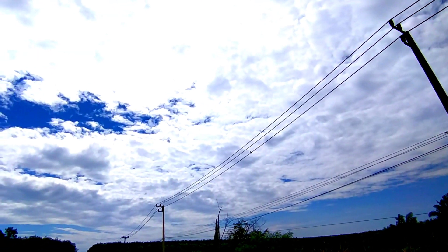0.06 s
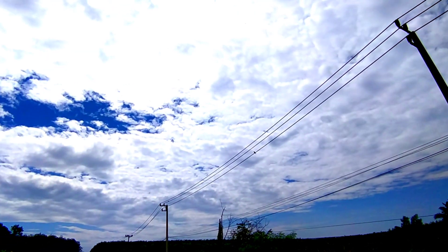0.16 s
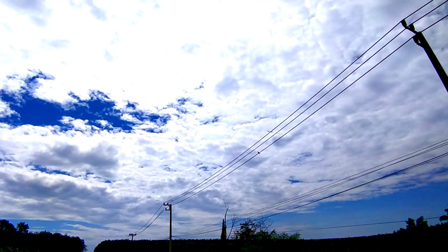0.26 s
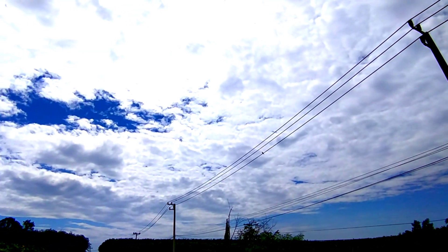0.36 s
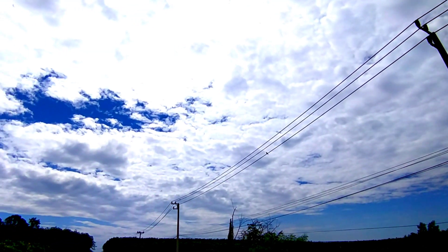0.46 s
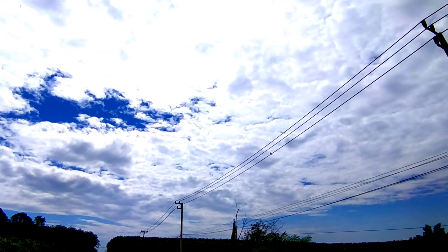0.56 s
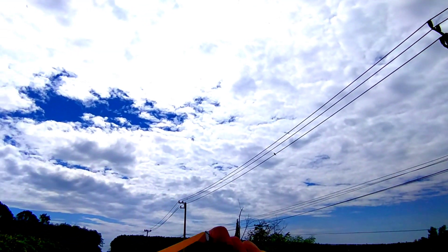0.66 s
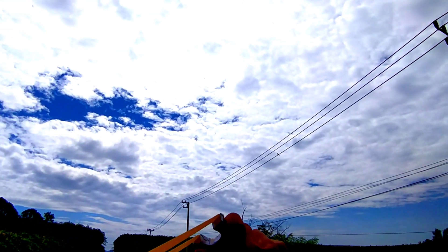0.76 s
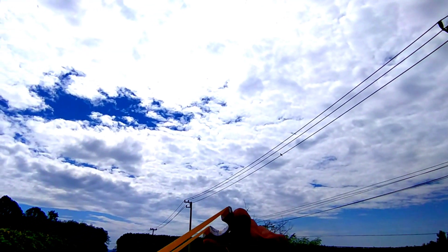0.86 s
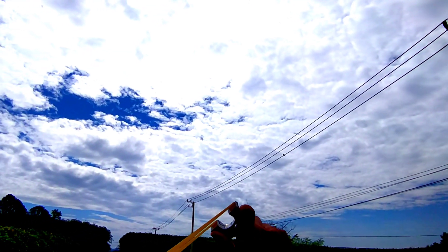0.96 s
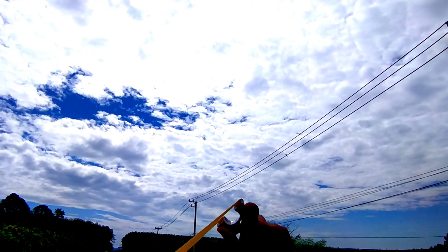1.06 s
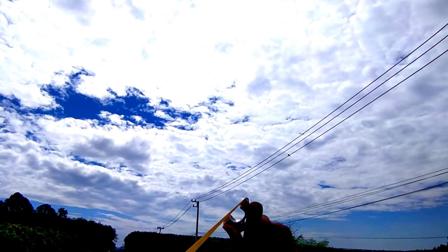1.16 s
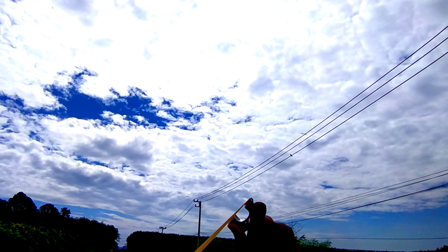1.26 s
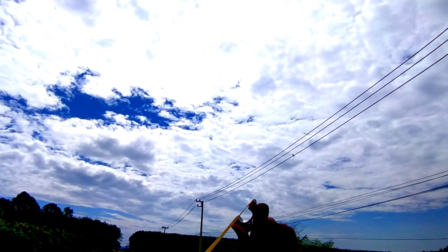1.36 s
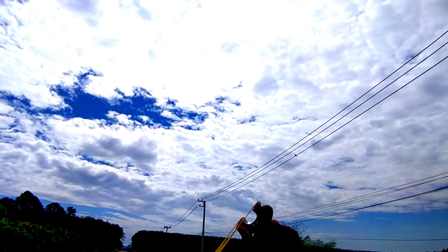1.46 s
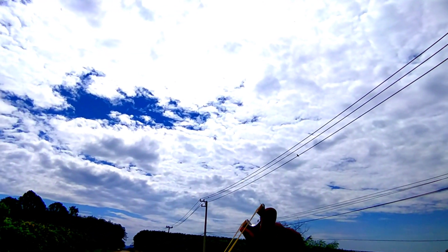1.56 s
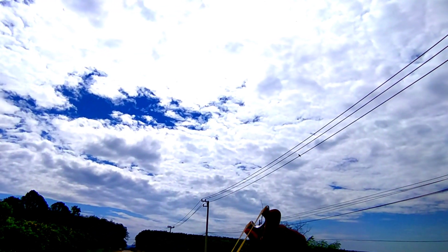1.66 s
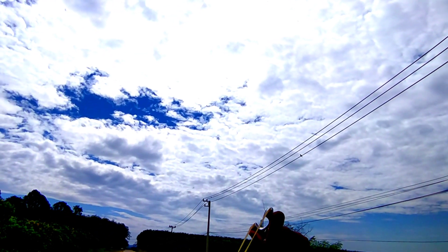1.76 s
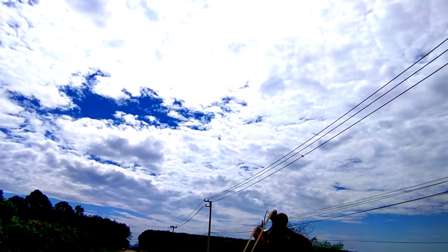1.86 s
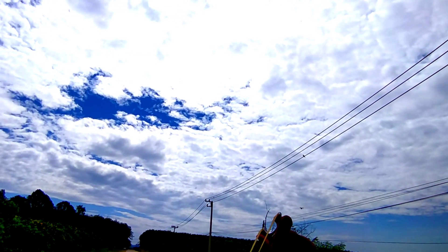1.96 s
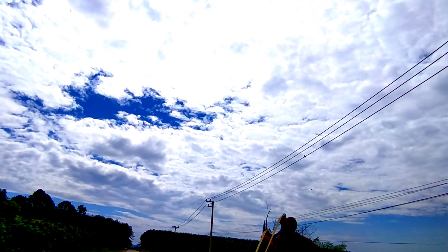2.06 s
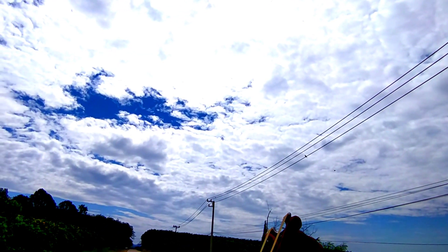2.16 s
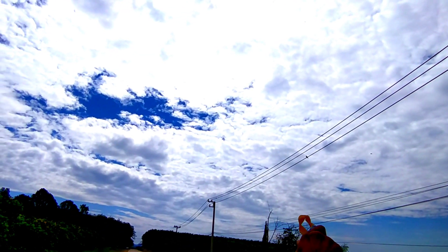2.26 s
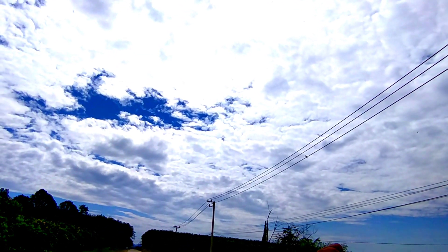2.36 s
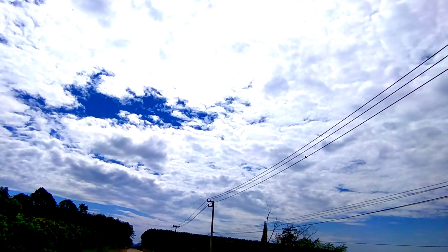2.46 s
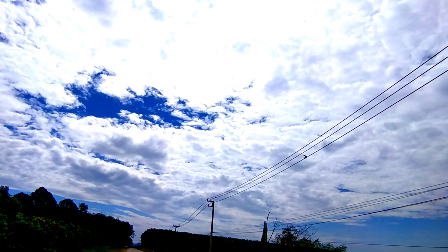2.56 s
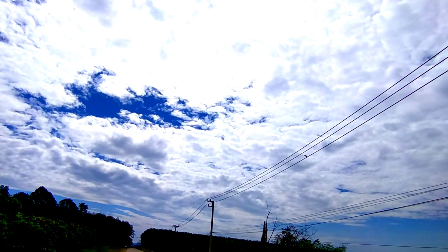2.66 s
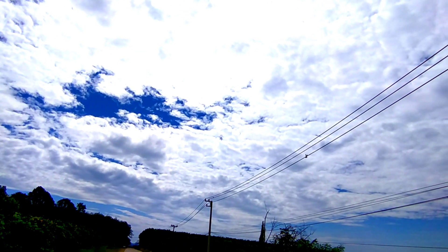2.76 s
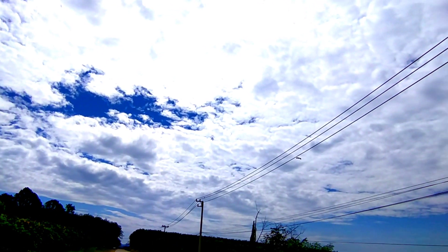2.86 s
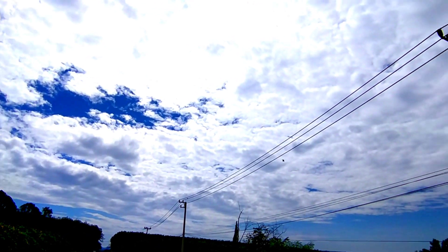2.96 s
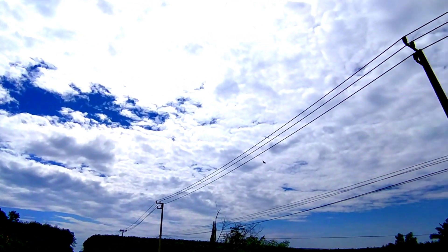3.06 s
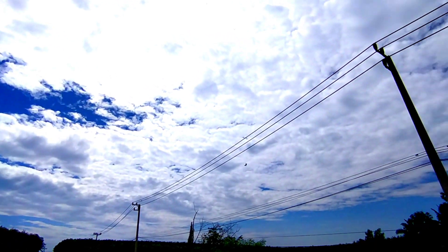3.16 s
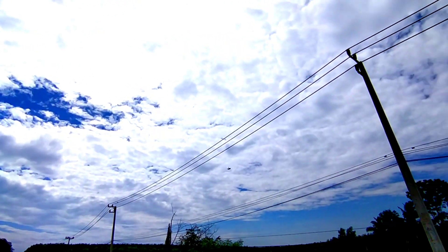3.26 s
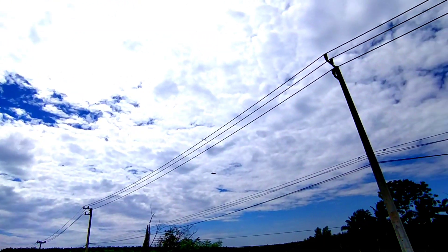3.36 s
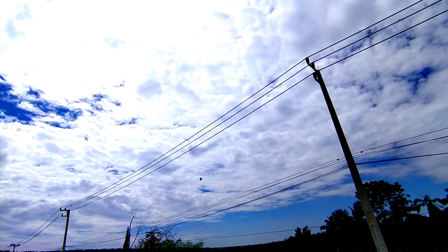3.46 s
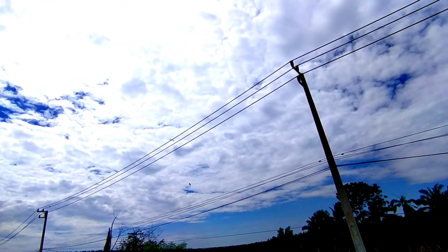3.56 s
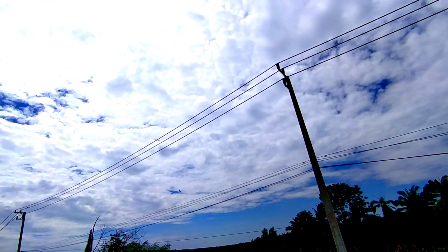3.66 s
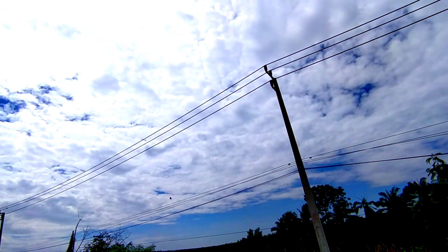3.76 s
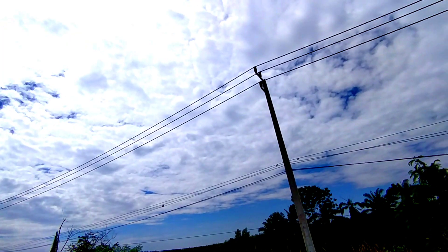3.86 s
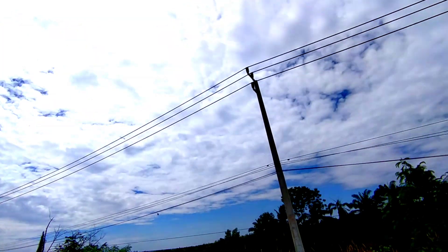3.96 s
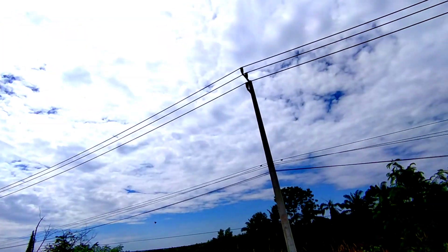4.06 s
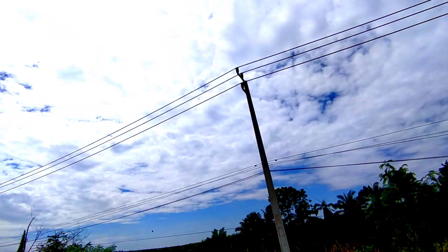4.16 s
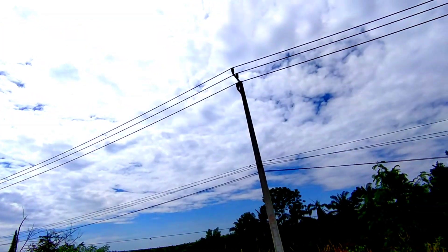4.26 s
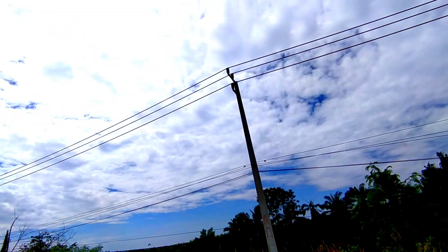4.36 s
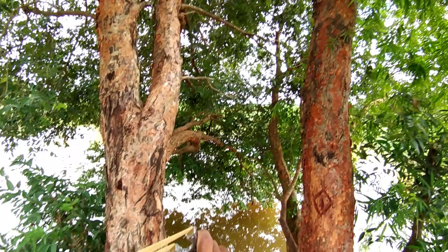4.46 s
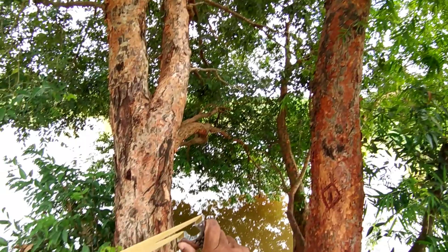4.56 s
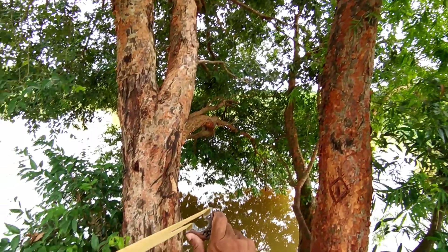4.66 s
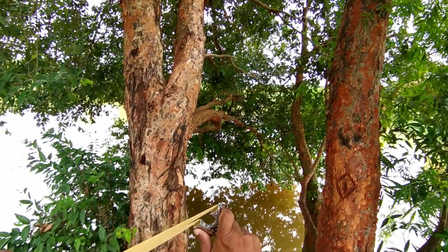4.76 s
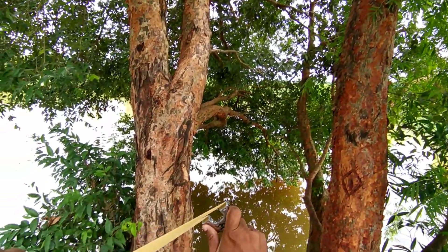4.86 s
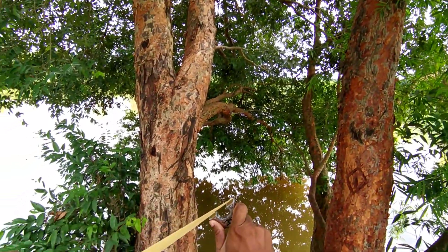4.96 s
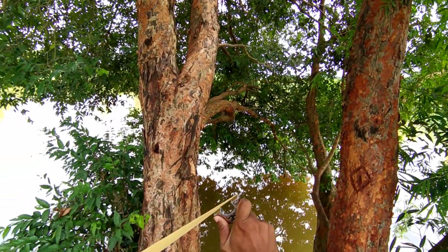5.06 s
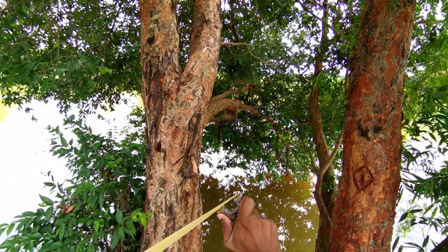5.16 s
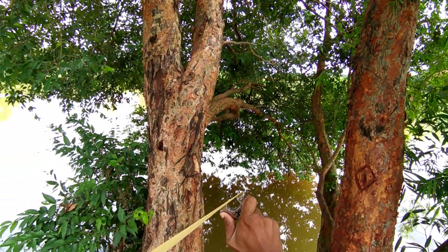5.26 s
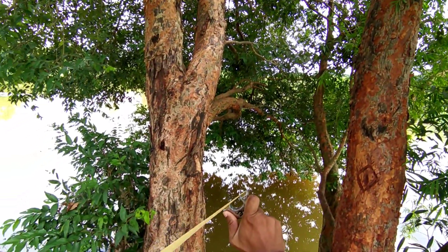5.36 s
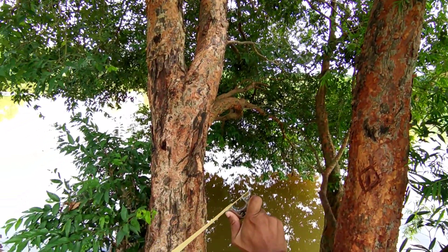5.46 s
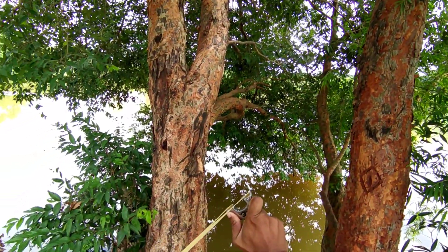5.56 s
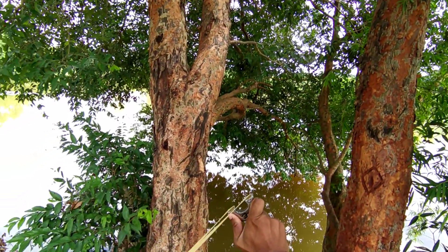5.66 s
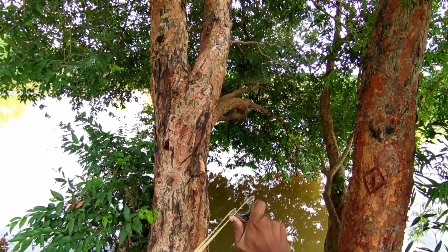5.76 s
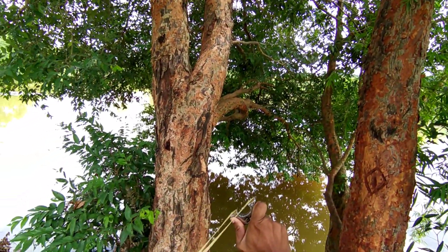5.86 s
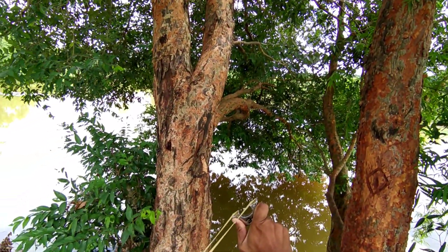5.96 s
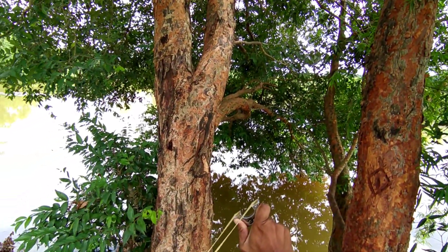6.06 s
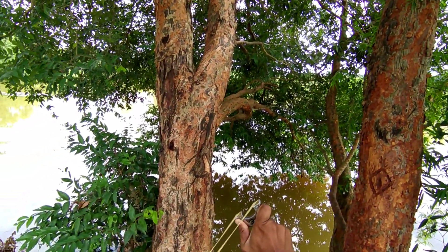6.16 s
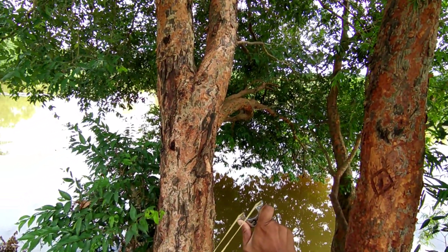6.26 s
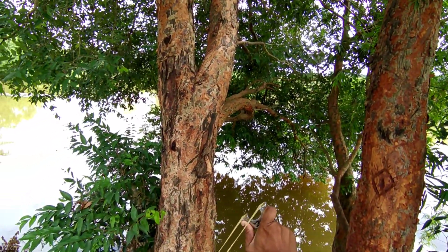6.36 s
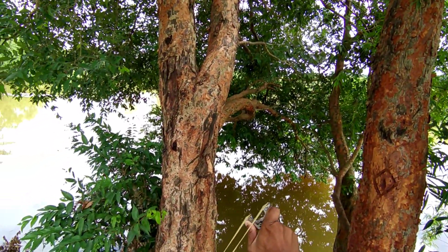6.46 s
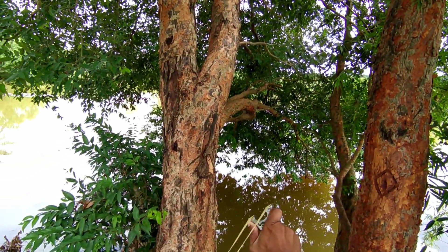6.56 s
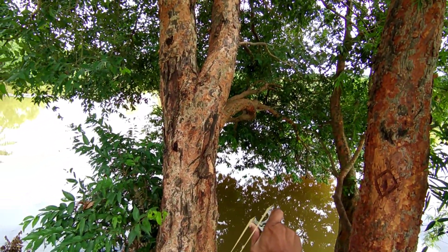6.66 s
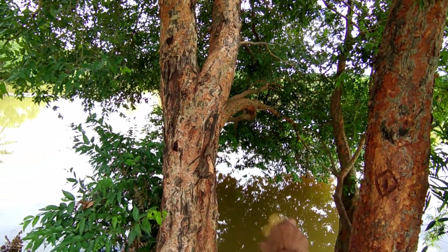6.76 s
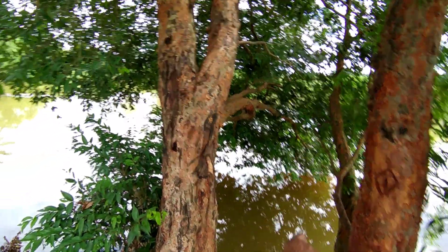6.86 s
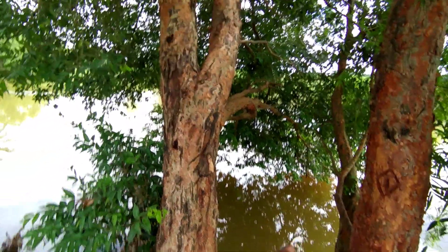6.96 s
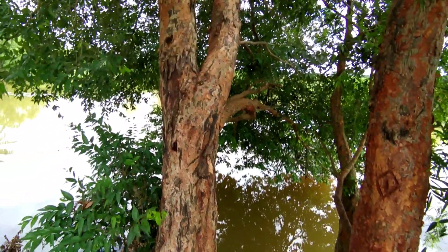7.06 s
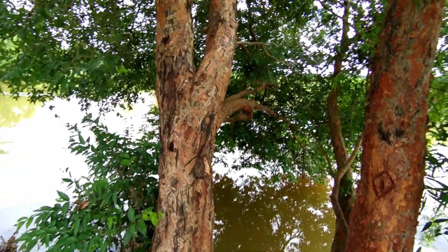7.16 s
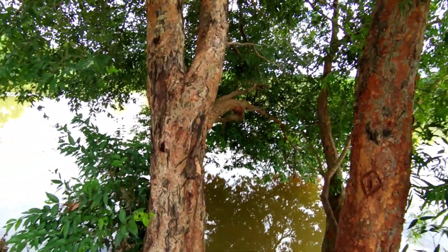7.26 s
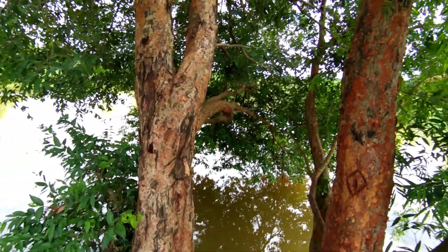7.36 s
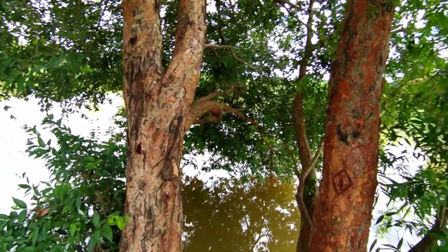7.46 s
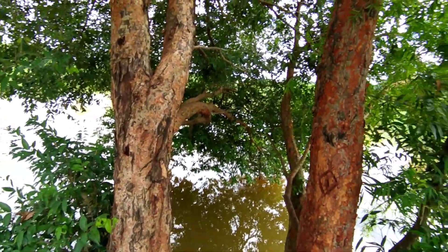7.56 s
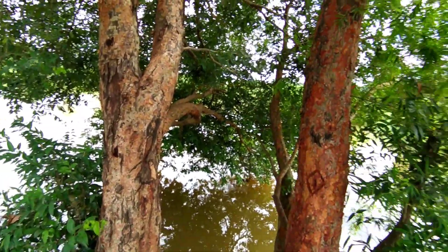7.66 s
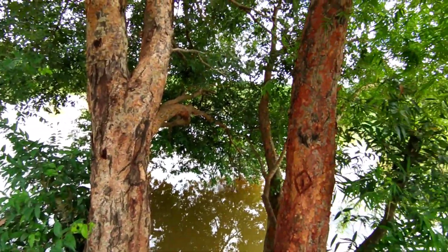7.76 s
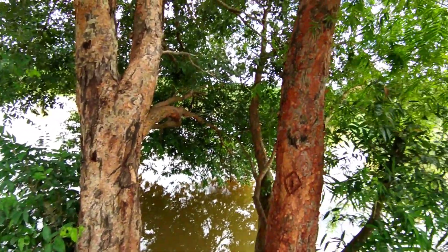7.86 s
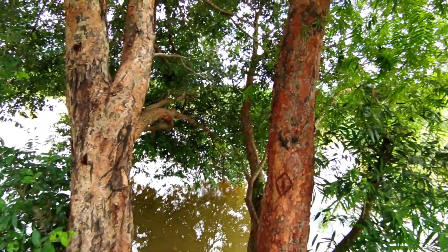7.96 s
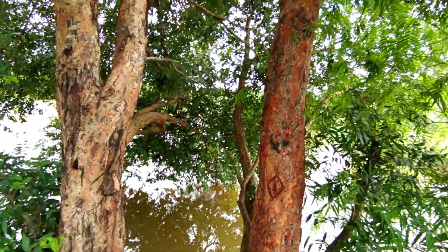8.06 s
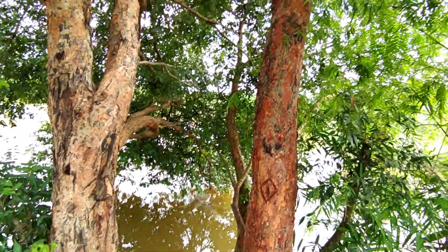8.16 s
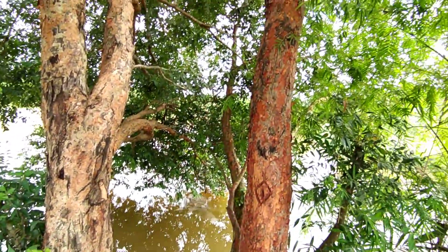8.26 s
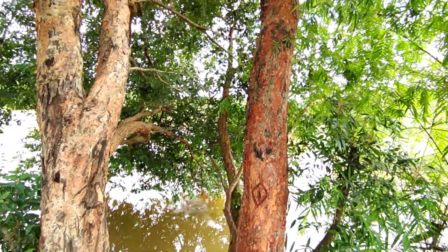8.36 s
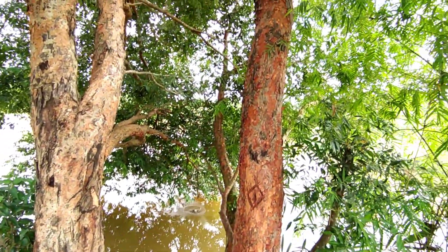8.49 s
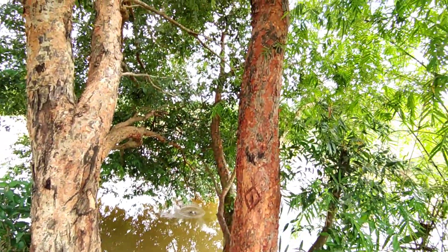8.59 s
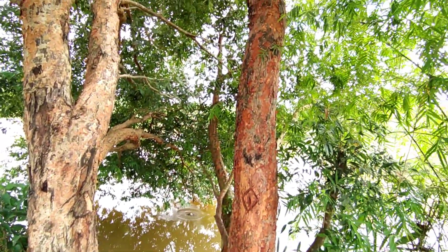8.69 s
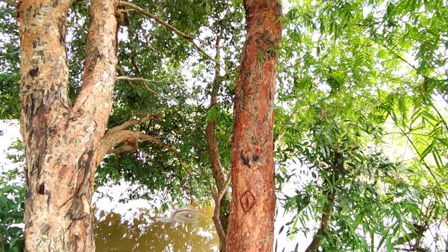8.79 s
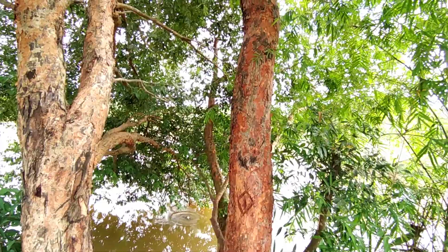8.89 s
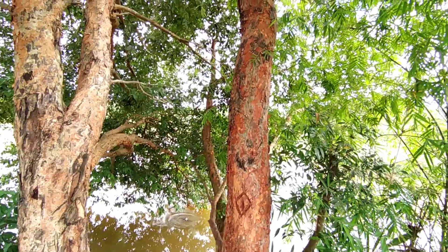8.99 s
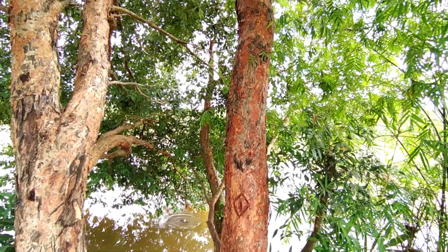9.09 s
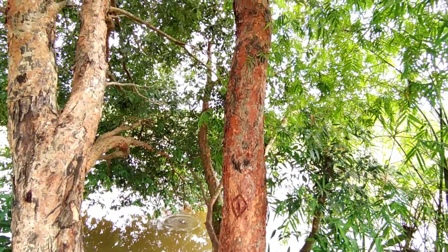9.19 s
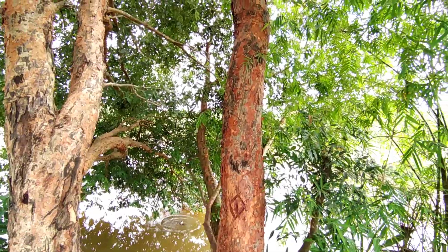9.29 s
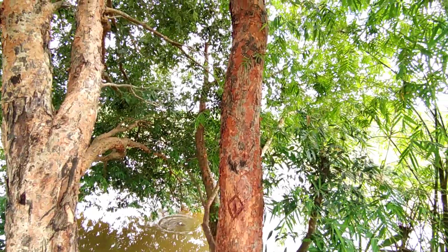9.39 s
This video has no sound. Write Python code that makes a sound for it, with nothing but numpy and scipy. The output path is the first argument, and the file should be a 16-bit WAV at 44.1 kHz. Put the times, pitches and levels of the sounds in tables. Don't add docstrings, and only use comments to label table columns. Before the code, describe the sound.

A one-cylinder engine chugs loudly outdoors, a slingshot cracks over it, then a cut to a quiet pond bank and a second snap with bark and leaf patter.

```python
import sys
import numpy as np
from scipy import signal
from scipy.fft import rfft, irfft, next_fast_len
from scipy.io import wavfile
from scipy.ndimage import uniform_filter1d

SR = 44100
rng = np.random.default_rng(int(sys.argv[2]) if len(sys.argv) > 2 else 0)


def put_to_file(sound):
    columns = np.atleast_2d(sound).T
    safe = np.clip(columns, -1, 1)
    whole_steps = np.round(safe * 32767)
    wavfile.write(sys.argv[1], SR, whole_steps.astype(np.int16))


def natural_amplitude(level_db):
    exponent = np.asarray(level_db, float) / 20
    return 10 ** exponent


N = 415863
TIME = np.arange(N) / SR

# pitch_hz, level_db
THUMP = [(170, -22), (280, -4), (500, -5), (750, -5), (1200, -6.5), (2500, -10.5), (3500, -20), (8000, -53)]


def evened(x):
    return x / np.sqrt(np.mean(x ** 2) + 1e-20)


def read(points, hz):
    f, value = np.transpose(points)
    return np.interp(np.log(hz + 1), np.log(f + 1), value)


def curve(rows, column):
    return np.interp(TIME, *np.transpose(rows)[[0, column]])


def add(mix, s, sound):
    part = mix[..., round(s * SR):][..., :sound.shape[-1]]
    part += sound[..., :part.shape[-1]]


def panned(db):
    return natural_amplitude(np.array([db / 2, -db / 2]).reshape(2, -1))


def coloured(x, points):
    gain = np.log(natural_amplitude(read(points, abs(np.fft.fftfreq(8192, 1 / SR)))))
    taps = np.fft.ifft(np.exp(np.conj(signal.hilbert(gain)))).real[:2048]
    return signal.oaconvolve(x, taps[None] / np.linalg.norm(taps), axes=1)[:, :x.shape[1]]


def resonate(x, hz, width):
    turn = np.exp(2j * np.pi * hz * np.arange(x.shape[-1]) / SR)
    r = np.exp(-np.pi * width / SR)
    return 2 * (turn * signal.lfilter([1 - r], [1, -r], x / turn)).real


def hums(rows):
    return sum(natural_amplitude(db) * evened(resonate(rng.standard_normal(N), hz, width)) for hz, width, db in rows)


def noise(points, likeness, patchy_db):
    frames, hz = N // 256 + 5, np.fft.rfftfreq(1024, 1 / SR)
    a, b, c, d, patches = rng.standard_normal((frames, 513, 5)).T
    patches = evened(uniform_filter1d(uniform_filter1d(patches, size=10, axis=0), size=12, axis=1))
    same = np.clip(read(likeness, hz), -1, 1)[:, None]
    left = a + 1j * b
    z = np.array([left, same * left + np.sqrt(1 - same ** 2) * (c + 1j * d)])
    z *= natural_amplitude(read(points, hz)[:, None] + patchy_db * patches)
    return evened(signal.istft(z, nperseg=1024, noverlap=768)[1][:, :N])


def engine():
    # delay_ms, size, width_ms
    arrivals = [(-10.8, .3, 1.3), (0, 1.05, 2.1), (9.6, .17, 1.5), (17.2, .8, 2.5), (22.3, .36, 2.4),
                (28.5, -.1, 3), (39, .2, 4)]
    # pitch_hz, level_db, t60_s
    silencer = [(175.2, -47, 0.78), (270.6, -42, 0.47), (324.9, -42, 0.39), (540, -50.5, 0.039),
                (774, -39.5, 0.049), (1200, -40, 0.031), (1510, -37, 0.01)]
    # pitch_hz, level_db_per_hz
    casing_colour = [(76, -33), (130, -3.5), (222, -11), (351, -8), (421, -13.5), (546, -3.5), (636, -18.5),
                     (918, -9.5), (3740, -27.5), (4630, -29.5), (5000, -33), (6500, -75), (11000, -120)]
    hiss_colour = [(2500, -30), (3600, -9), (5400, -0.5), (7800, 1.5), (9500, -1.5), (11000, 1),
                   (13000, -7), (15500, -6)]
    # time_s, level_db
    loudness = [(0.0, 2.5), (0.77, 2), (1.25, 1), (2.55, 1.07), (2.72, -1.5), (2.95, 0.2), (3.86, 1.06),
                (4.6, 0.65), (4.66, -1.5), (4.7, -13.5), (4.78, -46.5)]
    # pitch_hz, likeness
    likeness = [(60, -0.34), (180, 1), (540, 0.49), (1630, 0.2), (4900, -0.21), (14700, 0.3)]
    # pitch_hz, width_hz, level_db
    panels = [(351, 45, -41.5), (537, 45, -49), (763.2, 25, -48.5), (1563, 29, -54.5)]
    # time_s, turns_done
    crank = [(0.051, 0), (1.133, 13), (1.224, 14), (1.397, 16), (2.074, 24), (2.848, 33), (3.7, 43),
             (4.206, 49), (4.548, 53), (4.722, 55)]
    soft = [0, 10, 11, 12, 25, 26, 27, 34, 36, 40, 41, 44, 45, 46]
    lean = [3, 6, 19, 32, 38, 47, 49, 52, 54]
    missed = [2, 4, 8, 13, 15, 17]
    hard = [5, 14, 21, 22, 28, 53]

    puffs, kicks, t = np.zeros(N), np.zeros(N), np.arange(-900, 3000) / SR
    times, turns = np.transpose(crank)
    strokes = np.interp(np.arange(turns[-1] + 1), turns, times)
    full_db = 4.2
    burn_db = np.full(len(strokes), full_db)
    burn_db[hard], burn_db[soft], burn_db[lean], burn_db[missed] = 6.2, 2.2, -3.5, -10
    luck = rng.standard_normal((len(strokes), len(arrivals) + len(silencer) + 1))
    ring_t = TIME[:4000]
    for s, first_db, dice in zip(strokes, burn_db, luck):
        second_db = 3.3 + .8 * dice[-1] + .27 * (first_db - full_db)
        for k, (ms, size, width) in enumerate(arrivals):
            db = (first_db if k < 2 else second_db) + 1.3 * dice[k] * (k in (0, 2))
            u = (t * 1000 - ms) / width
            push = (1 - 0.31 * u ** 2) * np.exp(-.5 * u ** 2)
            add(puffs, s - 900 / SR, size * natural_amplitude(db) * push)
        for (hz, db, t60), die in zip(silencer, dice[len(arrivals):]):
            ring = natural_amplitude(db + second_db + 2.1 * die - 60 * ring_t / t60) * np.sin(2 * np.pi * hz * ring_t)
            for delay in (-.012, .03):
                add(kicks, s + delay + .004 * die, ring)

    puffs = natural_amplitude(-20.5) * signal.sosfilt(signal.butter(1, 29.88, "high", fs=SR, output="sos"), puffs)
    turn = 2 * np.pi * np.interp(TIME, times, turns)
    level_db = curve(loudness, 1)
    casing = noise(casing_colour, likeness, patchy_db=1.0) * natural_amplitude(-36.5 + level_db + 1.5 * np.cos(turn + 1.0))
    hiss = noise(hiss_colour, likeness, patchy_db=1.6) * natural_amplitude(-49.5 + 1.2 * level_db + 1.8 * np.cos(turn - .3))
    right = np.roll(puffs + 0.42 * kicks, 4) + 0.067 * np.roll(puffs, 160)
    pipe = np.array([puffs + kicks, right]) * natural_amplitude(0.57 * level_db)
    drone = hums(panels) * natural_amplitude(level_db - 1.5)
    return pipe + (casing + hiss + drone) * np.clip((4.79 - TIME) / 0.035, 0, 1)


def ticks():
    # start_s, peak_db, centre_hz, left_right_db, duller_part_db
    small_ticks = [(0.5168, -26.5, 7000, -7, -22), (2.7935, -34, 5000, 0, -2), (2.8112, -28.5, 6400, 3, -3),
                   (2.8325, -35, 10530, 7, -16), (2.9135, -38, 8000, 8, -20), (2.9712, -25, 6400, 0, -30),
                   (2.9712, -31, 11500, 3, -30), (2.9748, -36, 5500, 0, -20), (2.9748, -37, 11500, 3, -30),
                   (3.2545, -38, 7800, 4.5, -20), (3.767, -43, 10800, 3.5, -20),
                   (3.9361, -38, 10700, 8, -20.5), (4.0344, -39, 10600, 5, -20.5),
                   (4.1043, -38, 10800, 5.5, -20.5), (3.0864, -36, 7750, 6.5, -8),
                   (3.2126, -33.5, 8270, 6, -15), (3.7832, -29.5, 10640, 6, -1.5),
                   (5.4406, -59, 5024, 1, -1), (6.1684, -54.5, 5760, -1, -6.5),
                   (7.8706, -52.5, 10600, 7.5, -21), (8.3345, -58, 10700, 5, -9),
                   (8.3525, -50, 10500, 4.5, -5), (8.4612, -52, 11300, 6, -15), (8.6328, -64, 3220, 2, 1),
                   (8.745, -48, 11000, 2, -17.5), (8.8753, -48.5, 8900, 2, -4),
                   (7.8169, -49, 11060, 14, -21.5), (7.8862, -43.5, 10600, 14, -27.5),
                   (7.9383, -46.5, 6360, -6, -16), (8.1343, -47.5, 10900, 15, -18.5),
                   (8.1454, -48.5, 11200, 7, -18), (8.2207, -52, 10700, 0, -12),
                   (8.4222, -39.5, 4830, -2, -10), (8.4224, -49, 11000, 7, -30),
                   (7.891, -52, 11500, 11, -30), (8.6984, -41, 11140, -4, -9)]
    # start_s, peak_db
    swings = [(3.188, -39), (3.287, -32), (3.366, -30), (3.4481, -31.5), (3.531, -29), (3.6122, -29),
              (3.7, -35), (3.8736, -32), (3.967, -32), (4.0545, -33), (4.146, -33.5), (4.239, -36),
              (4.3336, -39), (4.4273, -38), (4.522, -34.5)]
    # start_s, peak_db, pitch_hz, t60_s, left_right_db
    rings = [(2.249, -33.5, 1960, 0.091, 2), (2.271, -36, 1560, .04, 1), (2.6455, -12, 670, 0.029, 23),
             (2.648, -12, 190, 0.092, 4.5), (2.646, -15, 280, .06, 2), (2.8105, -29.5, 2443, 0.02, -15),
             (5.6, -69, 1438, 0.26, 0.7), (7.203, -13, 271.3, 0.062, 8), (7.2001, -20, 528, 0.047, -7),
             (7.204, -26.5, 154, 0.14, 18.5), (7.313, -29, 1000, 0.018, 1), (7.4545, -40, 887, 0.047, -3),
             (8.138, -50, 2780, 0.028, 12), (8.224, -48.5, 1200, 0.039, 7), (8.228, -45.5, 796, 0.026, -2),
             (8.352, -53, 746, .06, 1), (8.337, -53, 860, .04, 4), (8.338, -55, 1500, .03, 0),
             (8.357, -58, 2040, .07, 1), (8.364, -58, 1250, .05, 1), (8.509, -55, 2640, .03, 0),
             (8.501, -56.5, 1760, .03, 0), (8.634, -55, 3190, .02, 0), (8.72, -62, 4080, .03, 0),
             (8.757, -58, 2900, .03, 0), (8.79, -53, 1700, .04, -1), (8.866, -59, 2470, .04, 0),
             (8.741, -53, 442, 0.14, -2), (8.783, -51, 1320, .04, 5), (8.903, -58, 2590, .03, 4.5),
             (8.94, -63, 1710, 0.04, 7), (8.505, -56, 2195, 0.028, 0), (8.554, -53.5, 1260, 0.039, 1),
             (8.699, -52, 1280, 0.039, 5), (8.728, -49.5, 1560, 0.051, -2), (8.78, -55, 2060, 0.045, -10),
             (9.062, -58, 1700, 0.041, 2)]

    out, t = np.zeros((2, N)), TIME[:6000]
    swing_hz, swing_pan_db, swing_dull_db = 7920, 8.5, -5
    click_t, width_hz = t[:2000], 5200
    rows = [*small_ticks, *[(s, db, swing_hz, swing_pan_db, swing_dull_db) for s, db in swings]]
    for (s, db, hz, pan_db, dull_db), white in zip(rows, rng.standard_normal((len(rows), 2, 2000))):
        if hz == swing_hz:
            knock, knock_at, rise_ms, drop_db, t60 = 4, 30, .7, 5, .03
        else:
            knock, knock_at, rise_ms, drop_db, t60 = 14, 8, .1, 10, .01
        white = white + .5 * white[::-1] + knock * (np.arange(2000) == knock_at)
        click = evened(resonate(resonate(white, hz, width_hz), hz, width_hz))
        click = click + natural_amplitude(dull_db) * evened(resonate(resonate(white, 2340, 2500), 2340, 2500))
        shape = np.clip(click_t * 1000 / rise_ms, 0, 1) * natural_amplitude(db - drop_db - 60 * click_t / t60)
        add(out, s, panned(pan_db) * click * shape)

    for (s, db, hz, t60, pan_db), white in zip(rings, rng.standard_normal((len(rings), 2, 6000))):
        splash = evened(resonate(resonate(white, hz, hz), hz, hz))
        splash = natural_amplitude(db - 0.5 - 90 * t / t60) * np.clip(t / 0.00055, 0, 1) * splash
        ring = np.sin(2 * np.pi * hz * t * (1 + 0.48 * t))
        ring = natural_amplitude(db - 60 * t / t60) * np.clip(t / 0.0014, 0, 1) * ring
        add(out, s, panned(pan_db) * splash)
        add(out, s, panned(pan_db) * ring)
    return out


def slaps():
    # start_s, peak_db, thump_under_it_db, t60_s, left_right_db
    flutters = [(2.633, -10.5, -6.5, 0.16, -0.5), (2.6455, -24, 18, 0.058, 0), (2.652, -20.5, 4, 0.053, -2),
                (2.67, -17, -12.5, 0.12, 5), (7.188, -19, -17.5, 0.37, -1.5),
                (7.1993, -11.5, 8, 0.068, 7.5), (7.223, -16.5, -20, .08, 2.5),
                (7.313, -19.5, -11.5, 0.17, -0.5), (7.43, -35, -10, 0.18, 2), (7.4535, -51, 13, 0.07, 1)]
    # start_s, half_width_ms, peak_db, thump_under_it_db, left_right_db
    cracks = [(2.6332, 0.65, -16.5, -4, 9), (2.644, 0.7, 2.5, -11, -1.5), (2.6546, 0.59, -14, -3, 0),
              (2.668, 1.5, -0.5, -8, -1), (7.1890, 0.37, -8.5, -8, 12), (7.1994, 0.9, -10.5, -10, -1),
              (7.2233, .8, -20, 7, 5), (7.3132, 0.54, -11, -19, 3), (7.3158, 1.19, -19, 5, 0.5),
              (7.43, 0.63, -27.5, -20, 6), (2.6478, 1.1, -13.5, 2.5, 2), (2.6775, .8, -17, -14, -0.5),
              (7.2048, .8, -20, 7, 5.5), (7.212, 1.5, -20, -1, 6)]
    # pitch_hz, level_db
    crack_colour = [(300, -41), (2000, -11), (3200, -11), (3700, -18), (4200, -12.5), (5200, -11),
                    (7500, -8), (9200, -4.5), (11300, -8), (12600, -16), (15500, -21.5)]

    bright, dull, t = np.zeros((2, N)), np.zeros((2, N)), TIME[:SR // 2]
    for s, db, thump_db, t60, pan_db in flutters:
        shape = panned(pan_db) * natural_amplitude(db - 7.5 - 60 * t / t60) * np.clip(t * 1000 / 0.87, 0, 1)
        add(bright, s, shape)
        add(dull, s, shape * natural_amplitude(thump_db))

    snap, knock = np.zeros((2, 2, N))
    from_peak = t[:800] - t[400]
    steepness = np.where(from_peak < 0, 1.6, .9)
    for (s, ms, db, thump_db, pan_db), white in zip(cracks, rng.standard_normal((len(cracks), 2, 2, 800))):
        shape = panned(pan_db) * natural_amplitude(db - 6) * np.exp(-.5 * (from_peak * 1000 / ms * steepness) ** 2)
        white = white * np.sqrt((shape ** 2).sum(1) / ((shape * white) ** 2).sum(2))[..., None]
        add(snap, s - t[400], shape * white[0])
        add(knock, s - t[400], shape * white[1] * natural_amplitude(thump_db))
    snap += np.array([[-.3], [1.5]]) * resonate(snap, 11500, 3500)

    a, b = rng.standard_normal((2, 2, N))
    chatter = evened(uniform_filter1d(rng.standard_normal(N), size=130))
    a = a * natural_amplitude(1.8 * chatter)
    bright = bright * evened(a + 0.017 * a[::-1]) + snap
    dull = dull * evened(b + 0.36 * b[::-1]) + knock
    return coloured(bright, crack_colour) + coloured(dull, THUMP)


def trees(x):
    # pitch_hz, t60_s
    decay = [(200, .15), (1000, 0.053), (4000, 0.2), (9000, 0.45), (15000, .35)]
    taps = np.zeros((2, SR))
    at = np.arange(300, SR - 20, 20) + rng.integers(0, 20, (2, (SR - 301) // 20))
    np.put_along_axis(taps, at, rng.choice([-1., 1.], at.shape), 1)
    hz, t, z = signal.stft(taps, SR, nperseg=256)
    t60 = np.maximum(read(decay, hz), .02)[:, None]
    tail = signal.istft(z * natural_amplitude(-60 * t / t60), SR, nperseg=256)[1]
    return signal.oaconvolve(x, tail / np.linalg.norm(tail[0]), axes=1)[:, :N]


def gusts():
    # start_s, suction, swell, right_port_share, swell_peak_s
    blows = [
        (2.6495, .4, .255, 1, .1),
        (7.202, .23, .175, .6, .088),
    ]
    out, t = np.zeros((2, N)), TIME[:SR]

    def lobe(peak, power):
        return (t / peak * np.exp(1 - t / peak)) ** power

    for s, suck, swell, right, peak in blows:
        suction = np.outer([-suck, -suck * right], lobe(.011, .9))
        back = np.outer([swell, .86 * swell * right ** 2], lobe(peak, 2.6) - .1 * lobe(.3, 1.5))
        add(out, s, suction + back)
    return out


def pond_bank():
    # pitch_hz, level_db_per_hz
    bank_colour = [(110, -31.5), (140, -11), (162, -4), (190, -10), (350, -8.5), (430, -10.5), (520, -8.5),
                   (1000, -14), (1500, -18), (3200, -26.5), (4600, -24), (5500, -28), (11000, -30),
                   (15500, -25)]
    breeze_colour = [(12, -23), (22, -6), (45, 5.5), (85, -3), (110, -13), (140, -31), (300, -50)]
    # pitch_hz, likeness
    likeness = [(60, 0.89), (180, 0.64), (540, 0.92), (1630, 0.23), (4900, 0.074), (14700, 0.05)]
    # time_s, level_db
    bank_level = [(4.58, -99), (4.66, -48), (4.76, -62), (5.37, -59.5), (5.6, -61), (8, -61.5), (8.6, -61),
                  (9.43, -60.5)]
    breeze_level = [(4.8, -56.5), (5.86, -54.5), (6.21, -59), (6.57, -53), (6.72, -56.5), (8.302, -55.5),
                    (8.604, -59.5), (8.692, -56), (9.342, -58), (9.43, -51.5)]
    # pitch_hz, width_hz, level_db
    far_hum = [(91, 7.1, -66.5), (161.3, 6.8, -69.5), (240, 8, -75.5)]
    bank = noise(bank_colour, likeness, patchy_db=0.14) * natural_amplitude(curve(bank_level, 1))
    bank[1] = np.roll(bank[1], 19)
    breeze = noise(breeze_colour, likeness, patchy_db=1.0) * natural_amplitude(curve(breeze_level, 1))
    breeze *= np.clip((TIME - 4.6) / 0.1, 0, 1)
    return bank + breeze + hums(far_hum) * (TIME > 4.7)


def bird():
    # time_s, pitch_hz, level_db, left_right_db
    whistle = [(4.868, 3680, -85.5, 4), (4.88, 3700, -68, 12), (4.936, 3777, -64, 16),
               (4.95, 3500, -63, 7.5), (4.966, 3000, -68, 6.5), (4.978, 2710, -56, 9.5),
               (5.04, 2310, -57.5, 6), (5.08, 2060, -69.5, 6), (5.09, 1990, -86, 3.5)]
    hz = curve(whistle, 1)
    flutter = evened(uniform_filter1d(rng.standard_normal(N), size=80)) * .032 * (hz < 3500)
    turn = 2 * np.pi * np.cumsum(hz * (1 + flutter)) / SR
    open_beak = np.clip((hz - 2600) / 1100, .02, 1) ** 2
    second = natural_amplitude(1) * np.clip((4.97 - TIME) / .09, .35, 1) * np.sin(2 * turn)
    third = natural_amplitude(-19) * np.sin(3 * turn)
    tone = np.sin(turn) + open_beak * (second + third)
    waver = evened(uniform_filter1d(rng.standard_normal(N), size=200))
    quiver = 1 + np.where(hz < 3500, .5, .15) * waver
    singing = (TIME > whistle[0][0]) * (TIME < whistle[-1][0])
    return np.sqrt(2) * tone * quiver * natural_amplitude(curve(whistle, 2)) * panned(curve(whistle, 3)) * singing


def leaves():
    # peak_s, rustle_db, rise_db_per_s, fall_db_per_s, share_under_2500_hz_db
    rows = [(4.95, -61, 398, 118, -25), (6.172, -68, 899.5, 120, -8), (6.95, -68, 299.5, 301, -13.5),
            (8.275, -72, 296, 300.5, -7.5), (8.75, -59.5, 300, 196, -5), (7.52, -64.5, 297.5, 24.5, -2),
            (7.991, -57.5, 97, 96.5, -9.5), (8.226, -62.5, 453, 72, 1), (8.342, -56.5, 188, 73, -19),
            (8.502, -78.5, 205, 31, 6), (8.703, -61.5, 900, 68, -11), (8.88, -68, 36, 102, -2),
            (9.07, -81, 303, 31, -3.5)]
    # pitch_hz, level_db
    rustle_colour = [(1500, -39), (3000, 1), (5500, 1), (8500, 1.5), (11000, 1.5), (15500, -7.5)]
    grains = rng.standard_normal((2, N)) * natural_amplitude(2 * np.minimum(rng.exponential(1, N), 5))
    grains = grains * (rng.random(N) < 11000 / SR)
    grains = evened(grains) * panned(2)
    shakes = []
    for s, db, rise, fall, _ in rows:
        slope = np.where(TIME < s, abs(rise) * (s - TIME), abs(fall) * (TIME - s))
        shakes.append(natural_amplitude(db - slope))
    low = sum(shake * natural_amplitude(row[-1]) for shake, row in zip(shakes, rows))

    patter, t = np.zeros((2, N)), TIME[:900]
    sizes = natural_amplitude(4 * rng.standard_normal(N)) * low
    for hz in np.geomspace(900, 4500, 12):
        falls = (rng.random(N) < 55 / 12 / SR) * sizes
        bit = np.sin(2 * np.pi * hz * t * (1 + 5 * t))
        bit = bit * natural_amplitude(-0.5 - 60 * t * hz / 45) * np.clip(t / .001, 0, 1)
        patter += panned(4 * rng.standard_normal()) * signal.oaconvolve(falls, bit)[:N]
    return coloured(grains * sum(shakes), rustle_colour) + coloured(grains * low, THUMP[2:]) + patter


def creaks():
    # start_s, length_s, peak_db, start_roughness
    pulls = [
        (5.967, 0.067, -71, 0.92),
        (6.59, .13, -65, 0.28),
        (6.969, .11, -60.5, 0.3),
    ]
    out = np.zeros(N)
    for s, length, db, start_rough in pulls:
        u = np.arange(0, length, 1 / SR) / length
        rough = start_rough + (.95 - start_rough) * u
        turn = 2 * np.pi * np.cumsum(1008 * (1 - .06 * u)) / SR
        pulses = evened(sum(np.cos(k * turn) for k in range(4, 9)))
        slips = np.clip(1 - 1.3 * rough, 0, 1) * pulses + rough * rng.standard_normal(len(u))
        fork = resonate(resonate(slips, 3850, 1200), 3850, 1200)
        fork = fork + .7 * resonate(slips, 5300, 1300) + .12 * resonate(slips, 7600, 900)
        add(out, s, natural_amplitude(db - 18 * (2 * u ** 1.3 - 1) ** 2) * evened(fork))
    return out


def scene():
    shots, song = slaps(), bird()
    echo = natural_amplitude(np.where(TIME < 4.7, -25, -13))
    near = shots + ticks() + leaves() + creaks() + gusts()
    return engine() + pond_bank() + near + song + trees(echo * shots + natural_amplitude(-9) * song)


def low_pass(x):
    return signal.sosfilt(signal.butter(12, 15620, fs=SR, output="sos"), x)


def record(dry):
    # pitch_hz, level_db
    left_port = [(3000, -0.88), (5500, 0), (8500, 1.5), (10800, 7), (12300, 3), (15000, -2)]
    right_port = [(3000, -0.5), (5500, 2), (8000, 3.5), (10000, -7), (12300, -9), (15000, -9)]
    size = next_fast_len(N)
    hz = np.fft.rfftfreq(size, 1 / SR)
    ports = natural_amplitude(np.array([read(left_port, hz), read(right_port, hz)]))
    heard = irfft(rfft(dry, size) * ports, size)[:, :N]
    return low_pass(np.clip(heard, -1, 1))


dry = scene()
out = record(dry)
put_to_file(out)
```